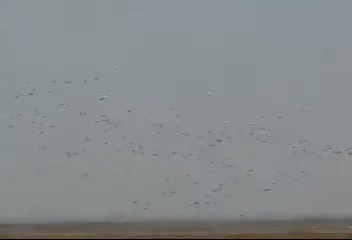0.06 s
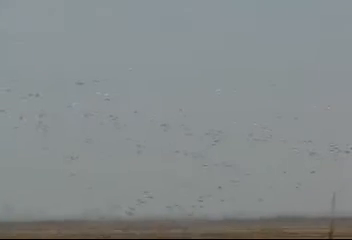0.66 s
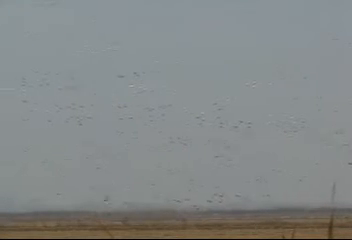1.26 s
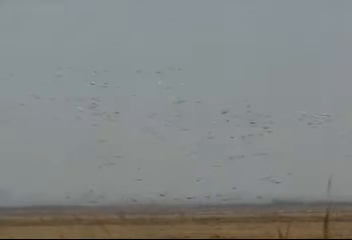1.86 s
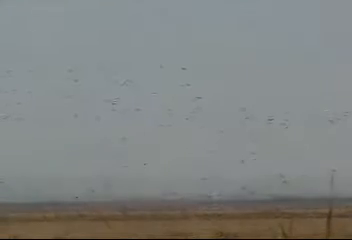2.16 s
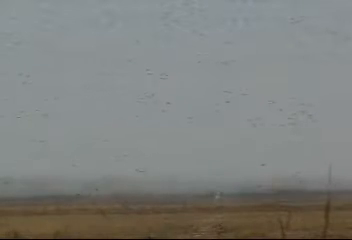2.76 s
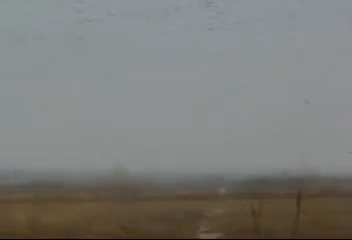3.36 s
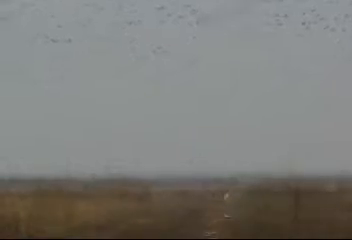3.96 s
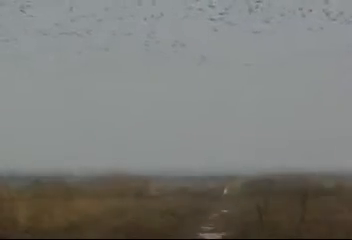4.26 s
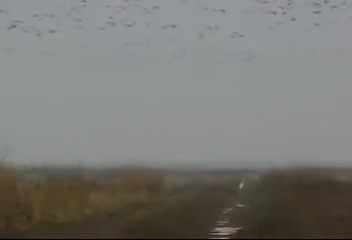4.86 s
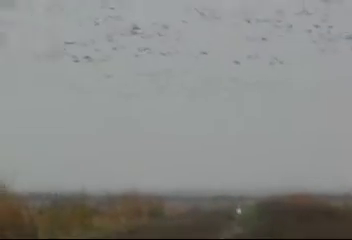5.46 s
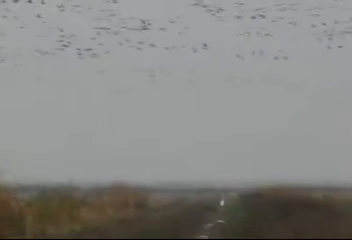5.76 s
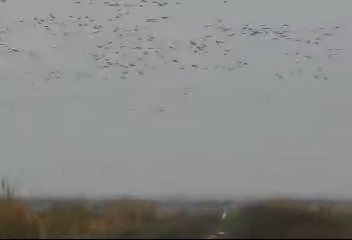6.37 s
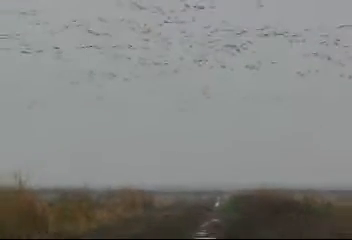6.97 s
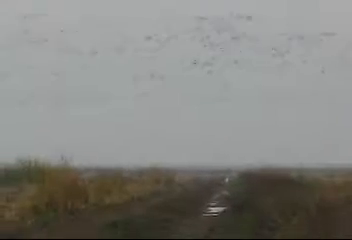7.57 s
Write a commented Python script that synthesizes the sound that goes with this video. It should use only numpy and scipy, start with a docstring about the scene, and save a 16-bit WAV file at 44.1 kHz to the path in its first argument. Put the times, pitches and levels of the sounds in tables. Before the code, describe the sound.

Hundreds of geese call in a dense, high chorus outdoors, interrupted by several loud handling knocks and clicks.

```python
"""Geese over farmland

A huge flock flies over: hundreds of high, arched yelps merge into a din, and nearer birds stand out.
A small bird chips overhead and a low rumble lies under everything. A hand-held camera whines and
hisses faintly; its case rubs, ticks and takes a few knocks, the hardest overloading the microphones."""
import sys
import numpy as np
from scipy import signal
from scipy.fft import rfft, irfft, next_fast_len
from scipy.io import wavfile
from scipy.ndimage import map_coordinates

SR = 44100
rng = np.random.default_rng(int(sys.argv[2]) if len(sys.argv) > 2 else 0)


def inscribe(sig):
    """Save sig as 16-bit PCM at rate SR to the path in sys.argv[1].

    A 1-D sig is mono; a 2-D sig holds one channel per row.
    Samples are clipped to [-1, 1] before scaling.
    """
    pcm = np.round(np.clip(np.atleast_2d(sig).T, -1, 1) * 32767)
    wavfile.write(sys.argv[1], SR, pcm.astype(np.int16))


N = 340893

# How loud the passing flock is: time_s, level_db
FLOCK_LEVEL = [(0.0, -31.5), (0.84, -31.5), (1.01, -31), (1.4, -30.5), (1.74, -28.5), (2.8, -31),
               (2.95, -29.5), (5.49, -30), (5.75, -35.5), (7.11, -35), (7.32, -33.5), (7.73, -34.5)]
# Calls of the nearest geese: start_s, length_s, pitch_hz, glide_octaves, throat_hz,
# nasal_lift_db, level_db, jitter_share (how much the pitch shakes)
NEAREST_YELPS = [(0.138, 0.078, 1560, -0.026, 4650, -4, -37, .004),
                 (0.34, 0.047, 1620, -0.086, 4700, 0, -39, .005),
                 (0.443, .1, 1600, 0.17, 4400, -8, -41, .006),
                 (0.523, 0.09, 1440, -0.14, 4400, 4, -44, .012),
                 (0.666, .075, 1450, -0.28, 4300, -2, -48, .004),
                 (1.14, 0.11, 1700, -0.13, 4900, -3, -43, .003),
                 (1.24, 0.05, 1340, .1, 4100, -3, -45, .004),
                 (1.298, .075, 1680, -0.045, 5000, -2, -42, .003),
                 (1.385, 0.054, 1475, -0.049, 4400, -3, -42, .004),
                 (1.442, 0.057, 1410, -.09, 4300, -1, -41, .004),
                 (1.49, 0.059, 1570, 0.016, 4700, 0, -36, .003),
                 (1.54, .07, 1360, -0.1, 4100, -4, -42, .004),
                 (1.62, .085, 1610, 0.14, 4800, -2, -37, .004),
                 (1.71, .065, 1370, .12, 4150, 8, -33, 0.0078),
                 (1.76, 0.09, 1510, -0.1, 4500, 2, -32, 0.0063),
                 (1.85, .08, 1590, 0.052, 4700, -5, -32, .006),
                 (2.222, 0.15, 1730, -0.1, 5200, 12, -33, .004),
                 (2.7, .11, 1400, -.09, 5600, 13, -38, .003),
                 (2.803, .07, 1113, 0.27, 2200, -2, -27.5, .006),
                 (3.0, 0.094, 1530, -0.01, 4600, 0, -34, .005),
                 (3.086, 0.11, 1410, -0.13, 4200, 2, -35, .005),
                 (3.737, 0.055, 1080, 0.13, 2400, 0, -27, .006),
                 (4.372, 0.11, 1410, -.04, 4260, -4, -34, .006),
                 (4.528, 0.21, 1610, 0.15, 4700, -2, -33, 0.0099),
                 (5.432, 0.1, 1420, 0.14, 2900, 5.5, -33, 0.0096),
                 (5.912, .125, 1418, -.11, 4400, 5, -31, .004),
                 (6.38, 0.089, 1585, -0.18, 3900, -2, -26.5, .022),
                 (6.469, 0.062, 946, 0.17, 4400, 2, -28.5, 0.019),
                 (6.573, 0.11, 1570, -0.1, 4800, 4, -31.5, .018),
                 (6.651, 0.089, 1290, -0.19, 2900, -3, -26.5, .024),
                 (7.18, 0.061, 1614, 0.16, 3400, -2, -26, 0.034),
                 (7.215, 0.095, 1700, -0.49, 3400, 0, -32, .019),
                 (7.219, 0.16, 1437, -0.17, 3000, 2, -31.5, 0.017),
                 (7.385, 0.089, 917, 0.17, 4600, 16, -34, .006),
                 (7.387, 0.13, 1020, -0.17, 2000, 3, -32.5, .015),
                 (7.416, 0.17, 922, -0.061, 1850, 4, -30.5, .015),
                 (7.524, 0.17, 965, 0.044, 1970, 2, -29.5, .015),
                 (7.54, 0.1, 880, -.08, 1750, -1, -34, .015)]
# A tone table says how strong low and high sounds are compared with each other.
# Tone of the far din, dulled by the air: frequency_hz, gain_db
DIN_TONE = [(450, -64), (700, -22), (800, -10), (900, -3.5), (1100, -8.5), (1400, -1.5), (1950, -3.5),
            (2300, -19), (2750, -9), (3250, -32), (4300, -15), (5200, -30.5), (6300, -40), (9000, -56)]
# Tone of the geese midway, mostly their lowest note: frequency_hz, gain_db
MIDWAY_TONE = [(900, -38), (1300, 0.5), (1750, -2.5), (2000, 0.5), (2300, -10), (2800, -15.5),
               (3400, -41), (4400, -31), (6000, -51)]
# Tone of the closer geese, rich in overtones: frequency_hz, gain_db
CLOSE_TONE = [(600, -32), (1400, -7), (1750, 3.5), (2000, -4), (2300, 6), (2800, 7), (3400, -9.5),
              (3900, 1), (4400, -1.5), (5200, -5), (6300, -27), (8500, -31)]
# The small bird's calls: start_s, length_s, start_hz, swoop_end_hz, end_hz, upper_start_db, level_db
CHIPS = [(.75, .083, 9600, 7600, 7200, -6, -56), (2.193, 0.063, 10000, 7700, 7450, -7, -44.5),
         (2.419, 0.065, 10000, 7860, 7550, -7, -46.5), (3.29, .076, 10300, 8600, 8400, -6, -57),
         (3.684, 0.08, 10600, 7730, 8150, -6, -37.5), (5.246, 0.12, 10700, 7060, 4800, -15, -47.5),
         (5.408, 0.074, 10300, 8300, 8100, -4, -50), (6.808, .075, 9800, 7750, 7600, -10, -46)]
# Knocks on the case: start_s, level_db, rattle_s, brightness_hz, ring_gain_db, push_db, push_hz
KNOCKS = [(3.3638, -15, 0.0037, 1000, -15, -7, 470), (3.907, -29, 0.0033, 400, -23, -25, 430),
          (4.043, -9, 0.0042, 4020, -18, -35, 480), (4.0453, -4.5, 0.007, 1650, -22, -6.5, 476),
          (4.344, -25, 0.0065, 700, -28, -28, 600), (4.817, 1.5, 0.0041, 3900, -14, -9, 500),
          (4.826, -3.5, 0.006, 1700, -15, -20, 560), (4.973, -30, 0.0048, 1200, -16, -42, 560),
          (5.112, -35, .005, 714, -20, -27, 600), (5.603, 2.5, 0.0057, 4200, -21, -6, 370),
          (5.613, -1.5, 0.0074, 2140, -14, -9.5, 590), (5.666, -14, 0.0064, 1060, -16, -17, 480),
          (5.774, -20, 0.0079, 1290, -15, -19, 480), (6.485, -25.5, 0.0055, 400, -18, -22, 402),
          (7.3798, -15.5, 0.0022, 2090, -14.5, -25, 600)]
# Notes the case rings with: pitch_hz, gain_db, fade_s (time to fall by 60 dB)
CASE_NOTES = [(600, 7, 0.055), (913, 5, 0.065), (1150, 8.5, 0.033), (1371, 8.5, 0.095), (1479, 14, 0.044),
              (2120, -9, 0.06), (2790, -2, 0.074)]
# Tone of a knock's rattle at each microphone: frequency_hz, left_db, right_db
RATTLE_TONE = [(60, -26, -28), (196, -24, -30), (324, -18, -3), (534, -12, -14.5), (624, 9, 2.5),
               (746, -18, 0), (950, -20, 3), (1290, 13.5, -2.5), (1570, -16, -6.5), (2180, -7, 4.5),
               (3440, -16.5, -5), (4940, -23.5, -22), (9600, -9, -8.5), (15000, -31, -26)]
# Small ticks of the case: start_s, gain_db
TICKS = [(3.363, -10), (3.912, -13.5), (4.041, -12), (4.2012, -16), (4.786, -11.5), (4.8156, -8),
         (4.973, -18.5), (5.001, -16), (5.5798, -10), (5.6018, -4), (5.789, -16), (7.0223, -13.5),
         (7.219, -14.5), (7.48, -23)]
# Tone of a tick: frequency_hz, gain_db
TICK_TONE = [(1000, 12), (3500, 15.5), (7000, 3), (11000, -5.5), (15000, -27)]
# The hand shifts on the case: start_s, length_s, level_db
RUBS = [(-.1, 0.7, -41.5), (2.246, 1.04, -43), (3.9, 1.08, -38.5), (5.648, 1.04, -39), (7.3, 0.67, -58)]
# Tone of the rubbing: frequency_hz, gain_db
RUB_TONE = [(120, 6), (300, 5.5), (480, 4), (600, 4), (750, 0), (1400, -3), (3000, -11), (8000, -74)]
# A sliding finger first, then the lens motor: start_s, length_s, centre_hz, width_hz, level_db
WHIRRS = [(4.028, 0.59, 9300, 2200, -59), (4.603, 0.36, 7450, 260, -60), (5.456, 0.36, 7400, 260, -57),
          (6.504, 0.72, 7400, 260, -59.5)]
# How the rumble rises and falls: time_s, gain_db
RUMBLE_SWELL = [(0.0, -36.5), (2.09, -31), (5.53, -31), (6.29, -36), (6.59, -33.5), (7.73, -33)]
# Tone of the rumble: frequency_hz, gain_db
RUMBLE_TONE = [(20, -17), (40, -5.5), (62, -2.5), (85, -4.5), (130, -5.5), (170, -12.5), (250, -18),
               (400, -29), (650, -31.5), (1200, -34), (3000, -84)]
# How the camera's hiss rises and falls: time_s, gain_db
HISS_SWELL = [(0.0, -68.5), (1.12, -70.5), (2.0, -65.5), (3.74, -64.5), (4.28, -61.5), (6.31, -66),
              (6.76, -63), (7.38, -64.5), (7.73, -63)]
# Tone of the hiss: frequency_hz, gain_db
HISS_TONE = [(300, 8), (3000, 20.5), (6500, 2), (7400, 1.5), (8100, 1.5), (9500, -2), (11500, -2.5),
             (12500, -16), (15000, -31)]
# How the two microphones hear the geese: frequency_hz, left_over_right_db, left_lead_rad, likeness_share
MICROPHONES = [(500, 8, -1.5, 1), (900, -0.2, 0.39, 1), (1340, 2.5, 0.34, 0.87), (2200, -5, 0.59, 1),
               (2333, 6, -12, 0.43), (2590, -19, 0.9, 1), (3100, 6, 1.5, 0.6), (4700, 8.5, 1.77, 1),
               (5470, 49, 9, 0.2), (6500, 9, 1, 0)]


def geese():
    """Far birds blur into a din, those midway keep their pitch, and closer ones keep their overtones."""
    flock_db = over_time(FLOCK_LEVEL)
    close_db = -43 + 0.042 * (flock_db - flock_db.mean())  # barely follows the flock's swell
    group = chorus(count=800, pitch_hz=1154, spread=.3, jitter=.014, length_s=.085)
    din = [coloured(throng(group, count=6) + amp(-6) * rng.standard_normal(N), DIN_TONE)
           for _ in range(2)]
    midway = chorus(count=400, pitch_hz=1590, spread=.13, jitter=.004, length_s=.072)
    close = chorus(count=380, pitch_hz=1430, spread=.17, jitter=.005, length_s=.072)
    calls = amp(flock_db - 7) * coloured(midway, MIDWAY_TONE)
    calls += amp(close_db) * coloured(close, CLOSE_TONE)
    calls += nearest_geese()
    direct = amp(flock_db - 1.08) * din[0] + calls
    scattered = amp(flock_db - 2.08) * din[1] + ground_echo(calls, fade_s=0.026)
    return microphones(direct, scattered)


def nearest_geese(arch_octaves=0.0292, nasal_hz=2820):
    """Yelps heard one by one: a throat ring and a nasal ring shape the overtones above a weak low note."""
    track = np.zeros(N)
    for start_s, length_s, pitch_hz, glide, throat_hz, nasal_lift_db, level_db, jitter in NEAREST_YELPS:
        pitches = pitch_hz * 2 ** np.array([-glide / 2 - arch_octaves, 0, glide / 2 - arch_octaves])
        hz = pitch_hz * np.arange(1, 7)
        throat_db = 11 * np.exp(-(np.log(hz / throat_hz) / 0.28) ** 2)
        nasal_db = nasal_lift_db * np.exp(-(np.log(hz / nasal_hz) / 0.21) ** 2)
        air_loss_db = 7 * (hz / 5000) ** 4  # the air swallows the highest overtones
        harmonics_db = throat_db + nasal_db - 15.5 - air_loss_db - 6 * (hz == pitch_hz)
        add(track, start_s, amp(level_db) * yelp(length_s, pitches, jitter, harmonics_db))
    return track


def yelp(length_s, pitches, jitter, harmonics_db, rasp_db=2.2, rasp_rate_hz=330):
    """One goose call: a note with overtones bends through three pitches, rough from an unsteady throat."""
    progress = np.linspace(0, 1, int(length_s * SR))
    start, middle, end = pitches
    arch = (middle - (start + end) / 2) * 4 * progress * (1 - progress)
    pitch_hz = start + (end - start) * progress + arch
    quaver, flutter = [np.interp(progress * length_s * rasp_rate_hz, np.arange(100), points)
                       for points in rng.standard_normal((2, 100))]
    phase = (2 * np.pi * np.cumsum(pitch_hz * (1 + jitter * quaver)) / SR).astype(np.float32)
    tone = sum(np.float32(gain) * np.sin(k * phase) for k, gain in enumerate(amp(harmonics_db), 1))
    return tone * np.sin(np.pi * progress) * unit(amp(rasp_db * flutter))


def chorus(count, pitch_hz, spread, jitter, length_s):
    """Many geese call at loosely even times, each with its own pitch, arch, tone and loudness."""
    track = np.zeros(N)
    for start_s, traits in zip(np.linspace(-.15, N / SR, count), rng.standard_normal((count, 11))):
        traits = np.clip(traits, -1.8, 1.8)
        high, long, tilt, ending, late, loud = traits[:6]
        shape = np.array([.975 + .06 * tilt, 1, .915 - .03 * tilt + .025 * ending])
        pitches = pitch_hz * np.exp(spread * high) * shape
        call = yelp(length_s * np.exp(.25 * long), pitches, jitter, harmonics_db=2 * traits[6:])
        add(track, start_s + .025 * late, amp(2.5 * min(loud, 1)) * call)
    return unit(track)


def throng(group, count):
    """Copies of one group make a flock, each a little higher or lower and out of step with the rest."""
    samples = np.arange(N)
    speeds = np.exp(np.linspace(-.2, .2, count))
    copies = [np.interp((samples * speed + rng.uniform(0, N)) % N, samples, group) for speed in speeds]
    return unit(sum(copies))


def ground_echo(sound, fade_s):
    """The ground and the reeds scatter sound into a short, soft tail."""
    t = np.arange(SR // 2) / SR
    tail = rng.standard_normal(len(t)) * amp(-60 * t / fade_s)
    return signal.fftconvolve(sound, tail / np.linalg.norm(tail))[:N]


def microphones(direct, scattered):
    """Both microphones share the direct sound; the camera body shades and delays each in its own way."""
    def response(hz):
        balance_db, lead, likeness = over_frequency(MICROPHONES, hz)
        left = amp(balance_db / 2) * np.exp(.5j * lead)
        sides = np.array([left, 1 / left])
        sides /= np.sqrt(np.mean(np.abs(sides) ** 2, axis=0))
        blend = np.arccos(np.clip(likeness, 0, 1)) / 2  # more scattered sound makes the sides less alike
        mix = np.array([[np.cos(blend), np.sin(blend)], [np.cos(blend), -np.sin(blend)]])
        return sides[:, None] * mix
    return filtered(np.array([direct, scattered]), response).sum(axis=1)


def small_bird(swoop_share=0.53, split_hz=860, takeover_db=17, jitter=0.006):
    """Each chip swoops down, then hooks up or dives on; the voice box's two sides sing a little apart."""
    def voice(hz):
        phase = 2 * np.pi * np.cumsum(hz * (1 + jitter * wobble(510, len(hz)))) / SR
        return np.sin(phase) * amp(2.4 * wobble(164, len(hz)))

    track = np.zeros(N)
    for start_s, length_s, start_hz, swoop_end_hz, end_hz, upper_db, level_db in CHIPS:
        progress = np.linspace(0, 1, int(length_s * SR))
        swoop = np.maximum(1 - progress / swoop_share, 0) ** 1.3
        hook = np.maximum(progress - swoop_share, 0) / (1 - swoop_share)
        pitch_hz = swoop_end_hz + (start_hz - swoop_end_hz) * swoop + (end_hz - swoop_end_hz) * hook
        upper_gain = amp(upper_db + takeover_db * progress)  # the upper voice slowly takes over
        chip = (voice(pitch_hz) + upper_gain * voice(pitch_hz + split_hz)) / np.sqrt(1 + upper_gain ** 2)
        add(track, start_s, amp(level_db) * np.abs(np.sin(np.pi * progress)) ** 1.1 * chip)
    return np.array([track, track])


def knocks(push_fade_s=0.011):
    """A knock is a hollow push and a brief rattle of plastic parts, after which the case rings."""
    track, t = np.zeros((2, N)), np.arange(SR // 5) / SR
    for start_s, level_db, rattle_s, bright_hz, ring_db, push_db, push_hz in KNOCKS:
        shared_lows = filtered(rng.standard_normal(len(t)), lambda hz: .9 / (1 + (hz / 800) ** 4))
        rattle = filtered(shared_lows + rng.standard_normal((2, len(t))),
                          lambda hz: amp(over_frequency(RATTLE_TONE, hz)) / np.sqrt(1 + (hz / bright_hz) ** 3))
        rattle *= (1 - np.exp(-t / .0007)) * np.exp(-(t / rattle_s) ** 2)
        rattle /= np.sqrt(np.sum(rattle ** 2) / (rattle_s * SR))
        ring = np.zeros_like(rattle)
        for hz, gain_db, fade_s in CASE_NOTES:
            fade = amp(gain_db + rng.normal(0, 1.3, (2, 1)) - 60 * t / fade_s)
            note = np.sin(2 * np.pi * (hz * t + rng.random((2, 1))))
            ring += fade * note / np.sqrt(1 + (hz / bright_hz) ** 2)
        ring *= amp(ring_db) * (1 - np.exp(-t / 0.00082))
        push = amp(push_db - 60 * t / push_fade_s) * np.sin(2 * np.pi * push_hz * t)
        add(track, start_s, amp(level_db) * (rattle + ring) + push)
    return track


def ticks(rise_s=.001, fade_s=.009):
    """The case gives dry, bright clicks under the fingers."""
    track, t = np.zeros((2, N)), np.arange(SR // 30) / SR
    envelope = (1 - np.exp(-t / rise_s)) * amp(-60 * t / fade_s)
    for start_s, gain_db in TICKS:
        snap = coloured(rng.standard_normal((2, len(t))), TICK_TONE)
        add(track, start_s, amp(gain_db) * snap * envelope)
    return track


def hand_rubs(rest_db=-67, rise_s=0.086, fade_db=10, release_s=0.18):
    """The hand rubs softly on the camera, stirring the low ring of its case."""
    pressure = np.full(N, amp(rest_db))
    for start_s, length_s, level_db in RUBS:
        t = np.arange(int(length_s * SR)) / SR
        stroke = np.clip(np.minimum(t / rise_s, (length_s - t) / release_s), 0, 1)
        add(pressure, start_s, stroke * amp(level_db - fade_db * t / length_s))
    friction = rng.standard_normal(N) + 0.29 * rng.standard_normal((2, N))
    return pressure * amp(2.8 * wobble(25)) * coloured(friction, RUB_TONE)


def whirrs(edge_s=0.021):
    """A sliding finger and the lens motor each make a fine hiss that starts and stops quickly."""
    track = np.zeros((2, N))
    for start_s, length_s, centre_hz, width_hz, level_db in WHIRRS:
        t = np.arange(int(length_s * SR)) / SR
        noise = rng.standard_normal((2, len(t)))
        band = filtered(noise, lambda hz: np.exp(-.5 * ((hz - centre_hz) / width_hz) ** 2))
        envelope = np.clip(np.minimum(t, length_s - t) / edge_s, 0, 1)
        add(track, start_s, amp(level_db) * unit(band) * envelope)
    return track


def camera_whine(pitch_hz=7852, pictures_per_s=30, level_db=-60.5):
    """The camera's electronics sing one thin tone, whose pitch sways with every picture."""
    t = np.arange(N) / SR
    cycle = 2 * np.pi * pictures_per_s * t
    sway = 1.1 * np.sin(cycle) - .7 * np.sin(2 * cycle) + .3 * wobble(6)
    return amp(level_db) * np.sin(2 * np.pi * pitch_hz * t + sway)


def rumble_and_hiss():
    """A low outdoor rumble, nearly alike on both sides, and the camera's own hiss."""
    rumble = coloured(rng.standard_normal(N) + .11 * rng.standard_normal((2, N)), RUMBLE_TONE)
    hiss = coloured(rng.standard_normal((2, N)), HISS_TONE)
    rumble_db = over_time(RUMBLE_SWELL) + 1 + 0.6 * wobble(5.6)
    hiss_db = over_time(HISS_SWELL) + 23
    return amp(rumble_db) * rumble + amp(hiss_db) * hiss


def amp(db):
    """Turns decibels into a number to multiply by."""
    return 10 ** (np.asarray(db) / 20)


def unit(sound):
    """Scales a sound to an average strength (rms) of 1."""
    return sound / np.sqrt(np.mean(sound ** 2) + 1e-20)


def over_frequency(table, hz):
    """Reads between a table's rows at any frequency, giving each octave equal room."""
    row_hz, *columns = np.transpose(table)
    return np.squeeze([np.interp(np.log(hz + 1), np.log(row_hz + 1), column) for column in columns])


def over_time(table):
    """Joins (time_s, value) rows with straight lines, giving one value per sample."""
    return np.interp(np.arange(N) / SR, *np.transpose(table))


def wobble(rate_hz, size=N):
    """A smooth curve through rate_hz random points a second."""
    points = rng.standard_normal(int(size * rate_hz / SR) + 4)
    return map_coordinates(points, [np.arange(size) * rate_hz / SR])


def filtered(sound, response):
    """Multiplies each frequency in a sound by response(hz)."""
    size = next_fast_len(sound.shape[-1] + 8192)
    spectrum = rfft(sound, size) * response(np.fft.rfftfreq(size, 1 / SR))
    return irfft(spectrum, size)[..., :sound.shape[-1]]


def coloured(sound, tone):
    """Shapes a sound with a tone table, then scales it to strength 1."""
    return unit(filtered(sound, lambda hz: amp(over_frequency(tone, hz))))


def add(track, start_s, sound):
    """Mixes a sound into a track at the given time."""
    start = round(start_s * SR)
    first, last = max(start, 0), min(start + sound.shape[-1], N)
    if last > first:
        track[..., first:last] += sound[..., first - start:last - start]


def scene():
    """Birds in the sky, noises on the camera and a rumble underneath."""
    birds = geese() + small_bird()
    return birds + knocks() + ticks() + hand_rubs() + whirrs() + camera_whine() + rumble_and_hiss()


def record(dry, top_hz=15400):
    """The loudest knocks overload and have their peaks flattened; the highest treble is cut away."""
    return filtered(np.clip(dry, -1, 1), lambda hz: 1 / (1 + (hz / top_hz) ** 50))


dry = scene()
out = record(dry)
inscribe(out)
```